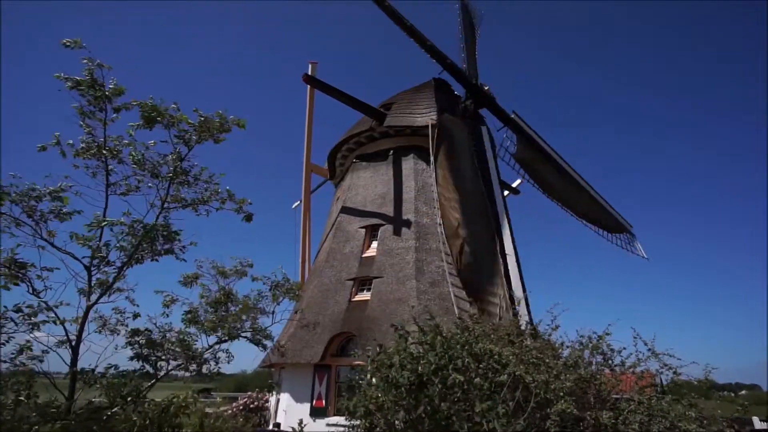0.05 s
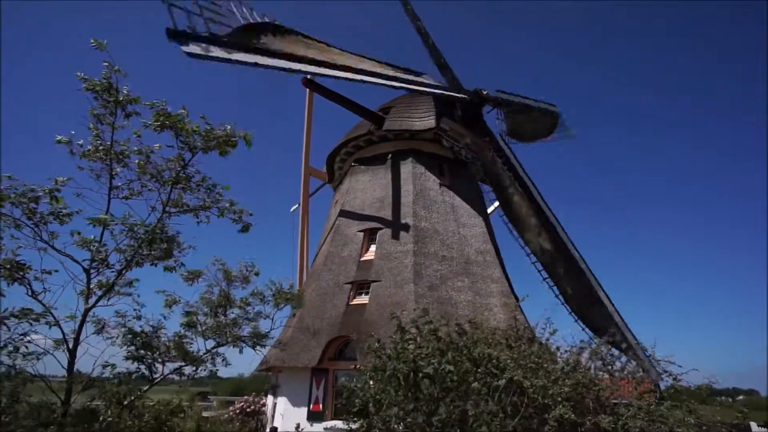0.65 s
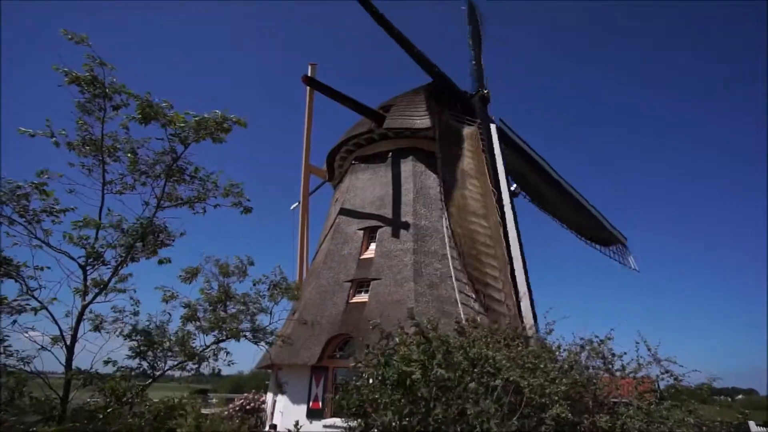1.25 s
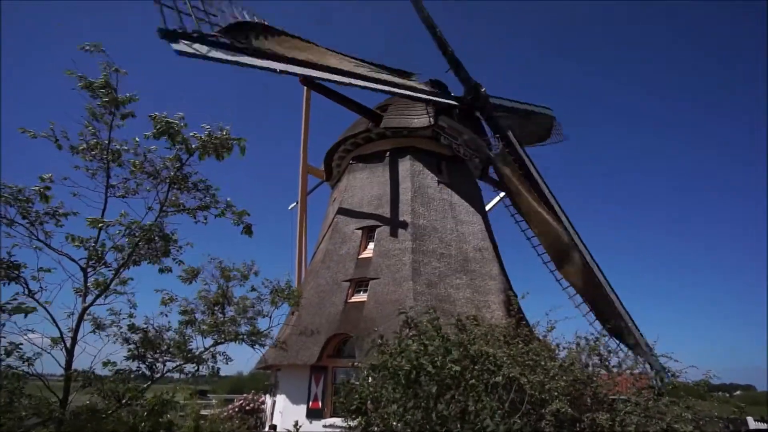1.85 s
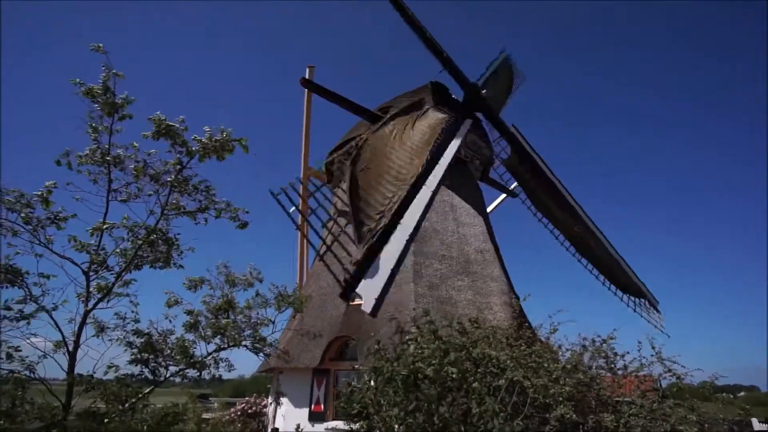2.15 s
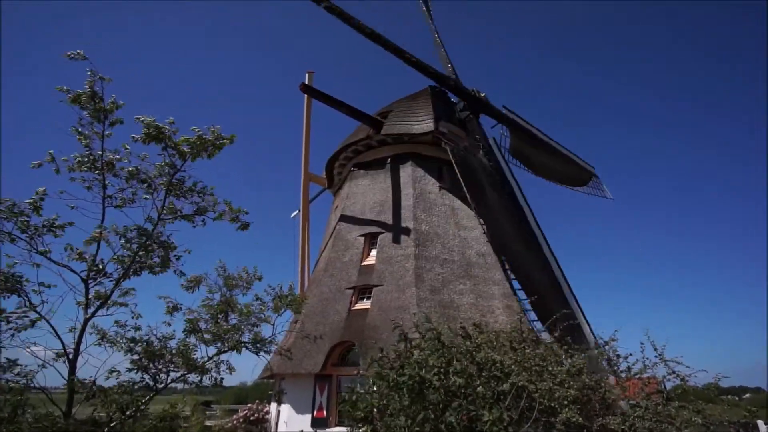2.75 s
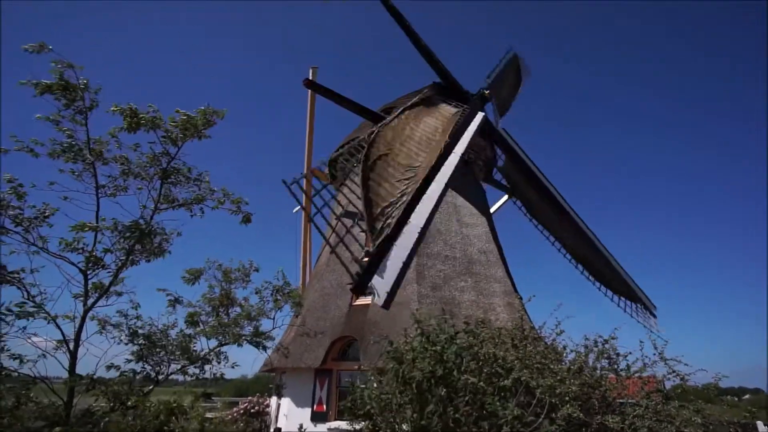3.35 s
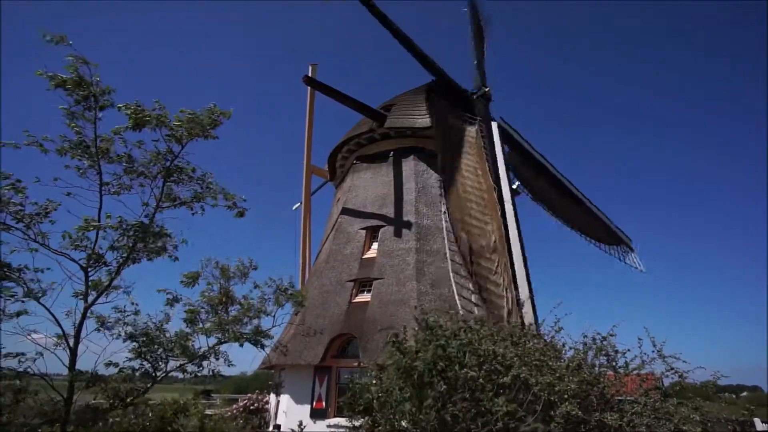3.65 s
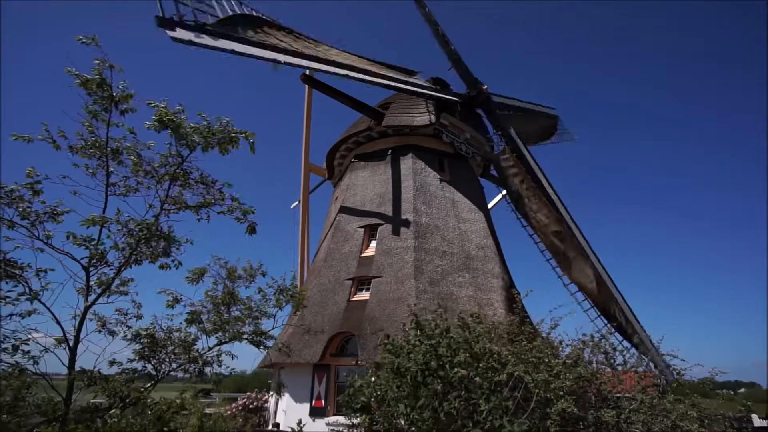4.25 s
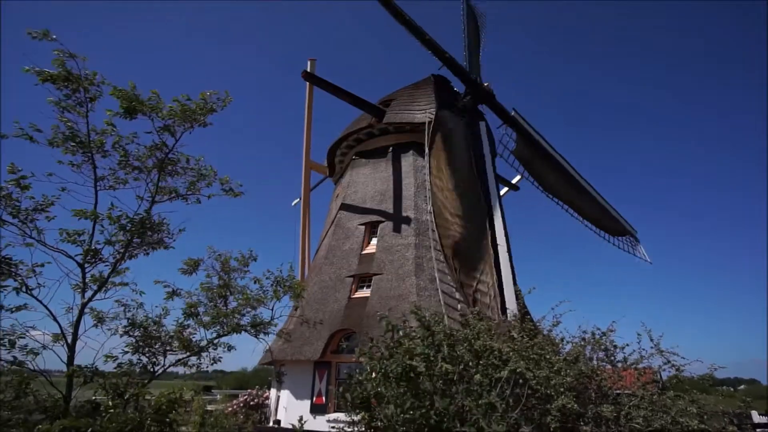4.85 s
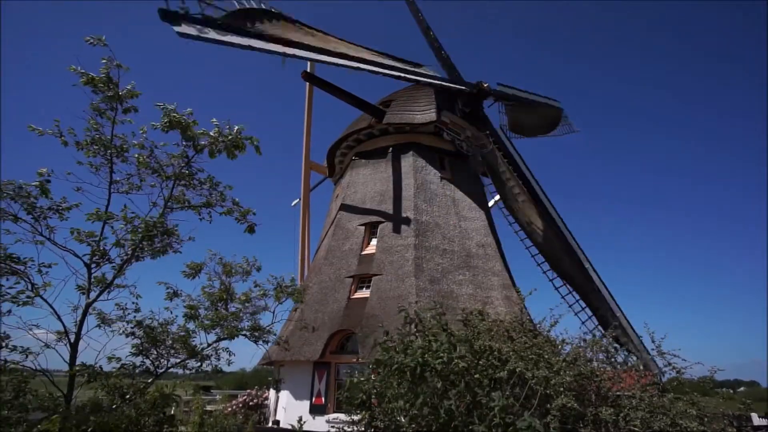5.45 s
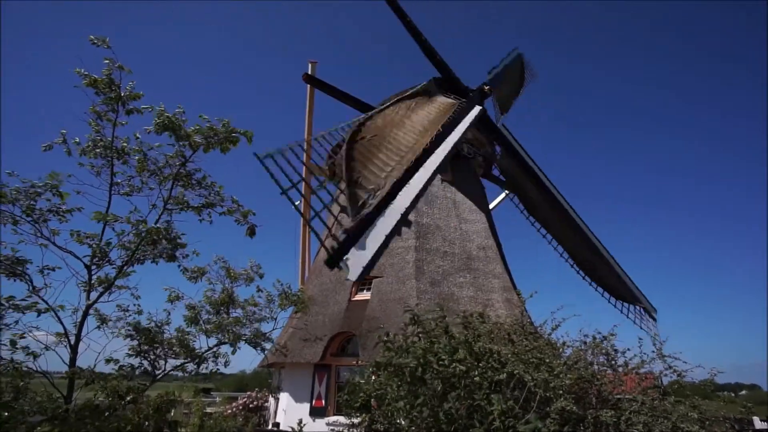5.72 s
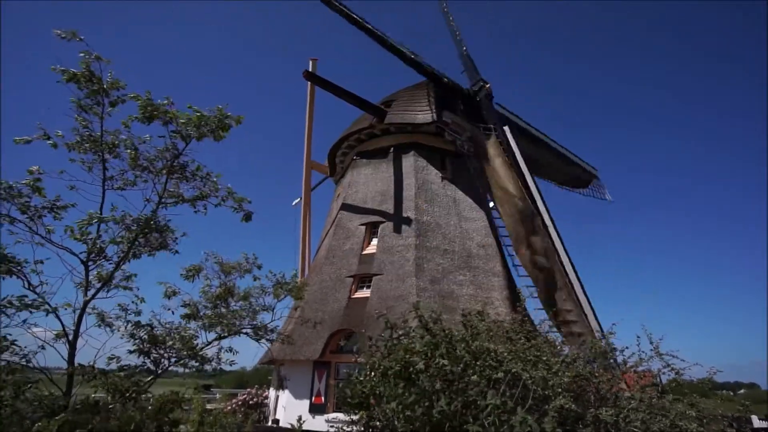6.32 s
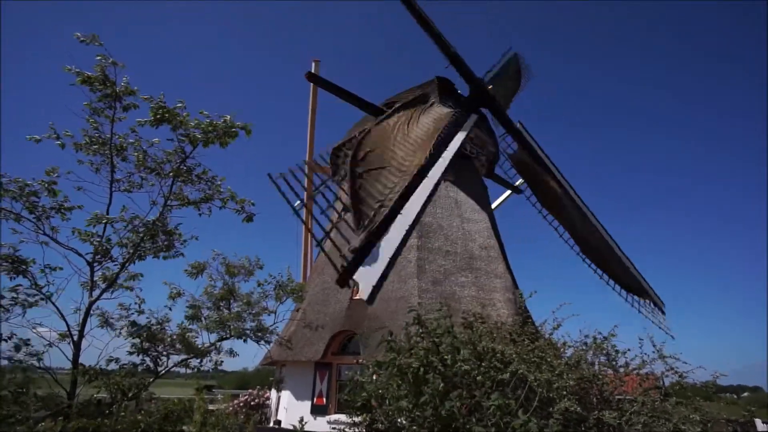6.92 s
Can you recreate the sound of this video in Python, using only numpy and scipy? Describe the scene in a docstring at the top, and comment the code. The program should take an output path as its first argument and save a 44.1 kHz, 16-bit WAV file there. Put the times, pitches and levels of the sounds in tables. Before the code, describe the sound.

Wind rushes continuously through trees, wide and soft, while a close bush rustles. Slightly to the right, windmill sails whoosh past in uneven swells roughly every 1.3 seconds, their canvas faintly crackling. Light gusts bump the microphone during the first second, and around 0.6 seconds come canvas flaps and dry wooden clacks. A few tiny chirps are barely audible. Scattered flaps and twig ticks follow, with leaves shaking from 2.5 seconds and sharp clacks just before 3. From 3 to about 4.1 seconds a strong gust buffets the microphone with low rumble and fluttering thumps, loudest near 3.5. It pushes the background down, and the level recovers slowly. From 4.2 to 6.4 seconds the sails swish on with soft canvas thuds, ticks and light wooden knocks, clustered around 5.7. A short buffet hits the microphone again near 7 seconds.

```python
"""A windmill turns in gusty wind, a little to the right of the microphone: its sails whoosh past,
their canvas flaps and crackles, and the woodwork clacks and knocks. Trees rush all around, a near
bush rustles and ticks, and a few faint chirps sound. Gusts buffet the microphone itself; the
strongest makes the gain control duck everything, and it recovers slowly."""
import sys
import numpy as np
from scipy import signal
from scipy.fft import rfft, irfft, next_fast_len
from scipy.io import wavfile
from scipy.ndimage import uniform_filter1d, map_coordinates

SR = 44100
rng = np.random.default_rng(int(sys.argv[2]) if len(sys.argv) > 2 else 0)


def master(y):
    """Save y as 16-bit WAV."""
    cut = np.clip(np.atleast_2d(y).T, -1, 1)
    pcm = np.round(cut * 32767)  # scale
    wavfile.write(sys.argv[1], SR, pcm.astype(np.int16))


N = 312228


def amp(db):
    """Decibels to gain."""
    return 10 ** (np.asarray(db) / 20)


def unit(x):
    """x scaled to rms 1."""
    return x / np.sqrt(np.mean(x ** 2) + 1e-20)


def along(points, hz):
    """(Hz, value) points read on a log axis."""
    f, v = np.transpose(points)
    return np.interp(np.log(hz + 1), np.log(f + 1), v)


def clock():
    """The time of every sample."""
    return np.arange(N) / SR


def curve(rows):
    """(s, value) rows joined by straight lines."""
    return np.interp(clock(), *np.transpose(rows))


def swell(s, half_width):
    """A smooth rise and fall around time s."""
    return np.exp(-((clock() - s) / half_width) ** 2)


def wobble(rate):
    """A smooth random curve, rate knots a second."""
    return map_coordinates(rng.standard_normal(4096), [clock() * rate], mode="mirror")


def add(out, s, sound):
    """Mix a stereo sound into out at time s."""
    out[:, round(s * SR):][:, :sound.shape[-1]] += sound


def filtered(x, response):
    """x through a filter whose gain is response(Hz)."""
    m = next_fast_len(N + 8192)
    return irfft(rfft(x, m) * response(np.fft.rfftfreq(m, 1 / SR)), m)[..., :N]


def low_cut(x, hz):
    """x with the bass rolled off below hz."""
    return signal.sosfilt(signal.butter(2, hz, "highpass", fs=SR, output="sos"), x)


def white():
    """Two unrelated white noises."""
    return rng.standard_normal((2, N))


def coloured(pair, spectrum, width):
    """Two unrelated signals become left and right, with a spectrum and a stereo width, at rms 1."""
    mid = filtered(pair[0], lambda hz: amp(along(spectrum, hz)))
    side = filtered(pair[1], lambda hz: amp(along(spectrum, hz) + along(width, hz)))
    return unit(np.array([mid + side, mid - side]))


def patchy(depth_db):
    """Two noises whose level drifts in patches of time and frequency."""
    spectra = signal.stft(white(), nperseg=512)[2]
    patches = uniform_filter1d(rng.standard_normal(spectra.shape[1:]), size=5, axis=0)
    patches = uniform_filter1d(patches, size=10, axis=1)
    return signal.istft(spectra * amp(depth_db * unit(patches)), nperseg=512)[1][:, :N]


def loudness(x, span):
    """Running rms of both channels over span seconds."""
    power = uniform_filter1d(np.mean(x ** 2, axis=0), max(int(span * SR), 1))
    return np.sqrt(np.abs(power) + 1e-12)


def evened(x, span):
    """Noise held near rms 1, so that a short burst of it has a definite strength."""
    return x / loudness(x, span)


def bursts(times, levels_db, t60s, attack):
    """An envelope of bursts that rise quickly to their level and die away."""
    envelope, t = np.zeros(N + SR), np.arange(SR // 2) / SR
    for s, db, t60 in np.broadcast(times, levels_db, t60s):
        shape = (1 - np.exp(-(t / attack) ** 2)) * np.exp(-np.log(1000) * t / t60)
        envelope[max(round(s * SR), 0):][:len(t)] += amp(db) * shape / shape.max()
    return envelope[:N]


# The wind out at the mill and the greenery. Each row: time in seconds, strength in dB.
WIND = [(0, -5), (.5, 1.5), (.9, -2.5), (2.2, -2.5), (3.1, 0.5), (4.3, 2), (5.4, -1), (6.0, 1.5), (7.08, 1)]
# A sail passes the tower, swings up, and the next comes down.
# Each row: delay of that swish in seconds, half width in seconds.
SWISHES = [(0, 0.11), (.33, 0.064), (.57, 0.044)]
# One pass after another. Each row: tower, upswing and downswing levels in dB.
SAIL_PASSES = [(-55, -28.5, -45), (-35, -33.5, -32.5), (-32, -48, -50), (-46, -52, -31), (-32, -33, -46),
               (-32, -53, -50)]
FIRST_PASS_S, PASS_PERIOD_S, LATTICE_DB = 0.056, 1.255, -33.5

def sail_flow():
    """Air over the sails: a steady share from the wind, and three swishes at every pass."""
    power = amp(LATTICE_DB + curve(WIND)) ** 2
    for k, levels_db in enumerate(SAIL_PASSES):
        for (delay, half_width), db in zip(SWISHES, levels_db):
            power += amp(db) ** 2 * swell(FIRST_PASS_S + k * PASS_PERIOD_S + delay, half_width)
    return np.sqrt(power)


# The whoosh as it reaches the microphone. Each row: frequency in Hz, relative level in dB.
WHOOSH_SPECTRUM = [(30, -31), (100, -10.5), (190, -3), (260, 0.5), (430, 0), (620, -4), (1000, -5),
                   (1400, -7.5), (1850, -14.5), (2200, -21), (3300, -21.5), (4500, -37), (11000, -48)]
# Stereo width of the sails. Each row: frequency in Hz, side minus mid in dB.
SAIL_WIDTH = [(200, -70), (600, -17), (1200, -6.5), (3000, -3.5), (6000, 6)]

def sails(flow):
    """Stocks and lattice cut the air in an even whoosh with a fine flutter."""
    flutter_db = .5 * wobble(25) + 1.27 * wobble(160)
    return flow * amp(flutter_db) * coloured(patchy(depth_db=2.0), WHOOSH_SPECTRUM, SAIL_WIDTH)


# Wind up in the trees. Each row: frequency in Hz, relative level in dB.
CANOPY_SPECTRUM = [(100, -52), (400, -1), (900, 12.5), (1400, 1.5), (1900, 3.5), (2200, -4), (3000, -14.5),
                   (3600, -9), (4500, -17), (8000, -18.5)]
# Stereo width in the open air. Each row: frequency in Hz, side minus mid in dB.
OPEN_WIDTH = [(300, -18), (1000, -12), (2000, 0.5), (4000, 1), (10000, 0.5)]

def trees(level_db=-38.5):
    """A wide, soft rush from the crowns rises and falls with the wind."""
    sway_db = .9 * wobble(12)
    rush = coloured(patchy(depth_db=-0.5), CANOPY_SPECTRUM, OPEN_WIDTH)
    return amp(level_db + curve(WIND) + sway_db) * rush


# Leaves near the microphone. Each row: frequency in Hz, relative level in dB.
RUSTLE_SPECTRUM = [(800, -55), (2500, 8), (3500, 6), (4700, 0.5), (5800, 4), (6900, -1.5), (7650, 0.5),
                   (8300, -1), (10100, -0.5), (11200, -4)]
# The bush is shaken. Each row: peak time in seconds, half width in seconds, level in dB.
BUSH_SHAKES = [(.38, 0.078, -42.5), (0.631, 0.076, -39), (1.3, 0.059, -66), (2.51, 0.096, -39),
               (2.92, 0.17, -39.5), (3.35, 0.18, -41.5), (4.34, 0.025, -38), (5.6, 0.1, -41),
               (6.761, 0.11, -49)]

def bush(level_db=-42.5, wind_share=0.1, touches_per_s=350):
    """Close by, sheltered leaves hiss and touch in tiny grains, more loudly when shaken."""
    touches = rng.random(N) < touches_per_s / SR
    touch_db = 12.0 * np.minimum(rng.exponential(size=N), 2.2)
    grains = coloured(touches * amp(touch_db) * white(), RUSTLE_SPECTRUM, OPEN_WIDTH)
    hiss = coloured(patchy(depth_db=1.5), RUSTLE_SPECTRUM, OPEN_WIDTH)
    power = amp(level_db + wind_share * curve(WIND)) ** 2
    power += sum(amp(db) ** 2 * swell(s, half_width) for s, half_width, db in BUSH_SHAKES)
    return np.sqrt(power) * amp(1.1 * wobble(21.74)) * (hiss + amp(-8.5) * grains)


# Light turbulence on the microphone between gusts. Each row: time in seconds, strength in dB.
BREEZE = [(0, -37.5), (1.05, -54), (1.65, -58), (2.1, -47), (2.75, -57), (3.35, -22.5), (4.6, -38.5),
          (5.1, -55.5), (5.62, -61), (5.9, -40.5), (7.08, -53)]
# Gusts right on the microphone. Each row: start in seconds, hold in seconds, strength in dB.
GUSTS = [(.01, 0.012, -26.5), (0.17, 0.086, -27.5), (0.347, 0.049, -30.5), (0.486, 0.017, -35.5),
         (0.74, 0.015, -30), (0.816, 0.19, -32.5), (1.997, 0.033, -30.5), (2.423, 0.07, -33.5),
         (2.899, 0.15, -27), (3.044, .02, -18.5), (3.114, 0.12, -18), (3.246, 0.25, -15.5),
         (3.448, 0.04, -5), (3.488, 0.038, -10), (3.655, 0.14, -19), (3.794, 0.083, -15.5),
         (3.863, 0.099, -18.5), (4.056, 0.015, -16), (4.11, 0.012, -24), (4.513, 0.036, -26),
         (5.87, 0.25, -39.5), (6.244, 0.4, -36), (6.307, 0.0081, -32), (6.793, 0.057, -33.5),
         (6.889, 0.012, -28), (6.972, 0.0084, -20), (7.027, 0.018, -26)]

def gust_force(attack_s=0.012, release_s=0.021):
    """Each gust rises out of the breeze, holds and drops away."""
    t, force = clock(), amp(curve(BREEZE))
    for s, hold, db in GUSTS:
        outside = np.maximum((s - t) / attack_s, (t - s - hold) / release_s)
        force = np.maximum(force, amp(db) * np.exp(-np.clip(outside, 0, 20)))
    return force


# Large eddies, then small ones, at the microphone. Each row: frequency in Hz, relative level in dB.
RUMBLE_SPECTRUM = [(20, -28), (40, -22), (75, -3), (150, 2.5), (260, 0), (450, -17), (800, -72),
                   (1500, -43), (3000, -70), (6000, -100)]
FLUTTER_SPECTRUM = [(80, -39), (200, 1), (350, 1.5), (650, -7), (1000, -19.5), (1500, -29.5), (2200, -38),
                    (4000, -51), (9000, -76)]
# How far the two microphone ports disagree. Each row: frequency in Hz, side minus mid in dB.
PORT_WIDTH = [(60, -5), (130, -8.5), (250, 0.5), (500, 5.5), (900, 3.5), (2000, 3)]

def buffeting(gusts):
    """Eddies rumble on the ports; faster air shifts energy to smaller ones, which flutter higher."""
    force = gusts * amp(.8 * wobble(25) + 1.6 * wobble(90))
    brightness = np.minimum(force / amp(-19.5), 1.4) ** 0.76
    rumble = force * evened(coloured(white(), RUMBLE_SPECTRUM, PORT_WIDTH), span=0.033)
    small_eddies = coloured(white() * amp(3.5 * wobble(220)), FLUTTER_SPECTRUM, PORT_WIDTH)
    flutter = force * brightness * evened(small_eddies, span=0.022)
    return amp(6.0) * rumble / np.sqrt(1 + 3 * brightness ** 2) + amp(4.5) * flutter


def kick(hz, start, apart):
    """A pressure kick of a few cycles whose swing slows; the sides lie +/- apart radians in phase."""
    t = np.arange(SR // 20) / SR
    age = t * hz / 0.66
    phase = 2 * np.pi * (start + 1.435 * hz * t / (1 + 0.15 * age))
    return (age * np.exp(1 - age)) ** 1.35 * np.sin([phase + apart, phase - apart])


# The hardest eddies to hit the microphone.
# Each row: start in seconds, relative level in dB, rough pitch in Hz.
HARD_EDDIES = [(0.016, -6, 417), (0.201, -2.5, 397), (0.228, -2.5, 477), (0.259, -4.5, 296),
               (0.503, -7, 330), (0.812, 0.5, 430), (0.819, -5, 295), (0.845, -3, 384), (0.988, -9.5, 230),
               (2.013, -19.5, 200), (2.030, -9, 220), (2.898, -2, 384), (3.049, -1, 333), (3.058, 3, 295),
               (3.11, 3, 322), (3.175, 8.5, 450), (3.186, 10, 593), (3.201, 10, 440), (3.259, 1, 385),
               (3.265, 8, 517), (3.316, -3, 298), (3.341, 6.5, 394), (3.408, 7, 720), (3.434, 14, 790),
               (3.452, 4, 330), (3.456, 15.5, 704), (3.48, 3, 380), (3.515, 7.5, 705), (3.532, 3, 480),
               (3.667, -1, 398), (3.716, 2, 450), (3.779, 9, 376), (3.823, 3, 298), (3.834, 7, 596),
               (3.85, 13.5, 590), (3.893, 3, 570), (3.923, 8.5, 267), (3.942, 1, 553), (3.949, 8, 410),
               (3.956, -8, 477), (4.055, 12, 330), (4.087, 6, 620), (6.891, -5.5, 279), (6.95, 4.5, 544),
               (6.962, 4, 450), (6.977, -4, 454), (7.015, -3, 253), (7.023, 0, 276)]

def puffs(gusts, lesser_per_s=12, usual_hz=406):
    """Single eddies kick the microphone's two ports out of step; lesser ones ride on the gusts."""
    out = np.zeros((2, N + SR))
    when, size, pitch = rng.random((int(lesser_per_s * N / SR), 3)).T
    lesser_db = 20 * np.log10(gusts[(when * N).astype(int)] * (1 + size) / 2) + 14.5
    eddies = HARD_EDDIES + list(zip(when * N / SR, lesser_db, usual_hz * 2 ** (pitch - .5)))
    for (s, db, hz), (start, turn) in zip(eddies, rng.random((len(eddies), 2))):
        apart = np.arctan(amp(along(PORT_WIDTH, hz))) * np.sign(turn - .5)
        add(out, s, amp(db - 6.5) * kick(hz, start, apart))
    return low_cut(out[:, :N], hz=70.4)


# Creasing cloth up on the sails. Each row: frequency in Hz, relative level in dB.
CREASE_SPECTRUM = [(400, -14), (1500, 3), (3400, 22), (5000, -34), (11000, -23)]

def crinkle(flow, count=100):
    """Small creases of the cloth crackle, more loudly when more air passes over the sails."""
    when, size = rng.random((count, 2)).T
    creases = bursts(when * N / SR, 5 * size ** 2 - 12.5, t60s=.016, attack=.0008)
    return creases * flow * evened(coloured(white(), CREASE_SPECTRUM, OPEN_WIDTH), span=.004)


# Faint chirps out in the open.
# Each row: start in seconds, pitch in Hz, relative level in dB, length in seconds.
CHIRPS = [(0.156, 2880, -18, 0.0026), (1.123, 2590, -28, 0.022), (1.133, 1500, -21, 0.0092),
          (1.137, 2240, -30, 0.017), (2.462, 10000, -26, 0.014), (2.47, 10740, -31, 0.021),
          (7.017, 4210, -22.5, 0.0095)]

def chirps(waver_hz=90, scatter_t60=0.08):
    """Brief, slightly wavering tones that scatter off the surroundings."""
    direct, t = np.zeros(N + SR), np.arange(SR // 16) / SR
    for s, hz, db, length in CHIRPS:
        waver = 1 + .022 * np.sin(2 * np.pi * (t * waver_hz + rng.random()))
        tone = np.sin(2 * np.pi * np.cumsum(hz * waver) / SR)
        arch = np.sin(np.pi * np.minimum(t / length, 1))
        direct[round(s * SR):][:len(t)] += amp(db - 7.5) * arch * tone
    t = np.arange(SR // 4) / SR
    tail = rng.standard_normal((2, len(t))) * np.exp(-np.log(1000) * t / scatter_t60)
    scatter = signal.fftconvolve(direct[None], tail / np.linalg.norm(tail[0]), axes=1)
    return direct[:N] + amp(1.5) * scatter[:, :N]


# Canvas flapping up on the lattice. Each row: start in seconds, relative thud level in dB,
# rough thud pitch in Hz, relative slap level in dB, slap t60 in seconds.
FLAPS = [(0.553, -34, 500, -31, 0.065), (0.576, -38.5, 440, -31, 0.14), (0.624, -31, 800, -30, 0.02),
         (0.639, -30, 805, -27, 0.025), (0.667, -46, 690, -21.5, 0.087), (1.255, -33.5, 328, -32.5, 0.19),
         (1.311, -47, 396, -29, 0.072), (1.835, -27, 620, -48, 0.042), (2.544, -38, 500, -26.5, 0.16),
         (4.192, -17.5, 480, -39, 0.058), (4.362, -20, 770, -28.5, 0.03), (5.082, -22, 390, -34, 0.038),
         (5.206, -29, 308, -30.5, 0.11), (5.403, -36, 700, -32, 0.018), (5.408, -17.5, 268, -46, 0.026),
         (5.663, -26.5, 700, -28.5, 0.33), (6.016, -40, 700, -41, 0.077), (6.321, -23, 520, -44, 0.019),
         (6.345, -30, 400, -37, 0.17), (6.406, -26.5, 398, -33, 0.034)]
# The cloth's low thud and brighter slap. Each row: frequency in Hz, relative level in dB.
THUD_SPECTRUM = [(40, -46), (150, -30), (260, 0), (380, -3.5), (550, -18.5), (800, -7), (1500, -24),
                 (4000, -78)]
SLAP_SPECTRUM = [(200, -4), (600, 0), (1000, 6.5), (1500, 4.5), (2200, -6), (3400, -12), (5000, -38),
                 (11000, -45)]

def canvas():
    """The cloth snaps taut with one dry kick and a crack, then shudders against the lattice."""
    kicks = np.zeros((2, N + SR))
    for s, thud_db, hz, _, _ in FLAPS:
        add(kicks, s, amp(thud_db + 9.5) * kick(hz, start=rng.random(), apart=0.055))
    kicks = low_cut(kicks[:, :N], hz=167)  # light cloth radiates little bass
    s, thud_db, _, slap_db, t60 = np.transpose(FLAPS)
    thud_noise = evened(coloured(white(), THUD_SPECTRUM, SAIL_WIDTH), span=0.0059)
    slap_noise = evened(coloured(white(), SLAP_SPECTRUM, SAIL_WIDTH), span=0.0061)
    shudders = bursts(s, thud_db - 0.5, t60 * 2.0, attack=0.0023)
    cracks = bursts(s, slap_db + 1.5, t60s=0.015, attack=0.0005)
    slaps = bursts(s, slap_db - 0.5, t60, attack=0.003)
    return kicks + shudders * thud_noise + (slaps + cracks) * slap_noise


def struck(modes, blows, off_centre_db, detune, spread):
    """Each (s, dB, Hz) blow rings the modes, off_centre_db weaker per octave from its own Hz."""
    out, t = np.zeros((2, N + SR)), np.arange(SR // 6) / SR
    hz, mode_db, t60 = np.transpose(modes)[..., None]
    for s, db, centre_hz in blows:
        strength_db, shift, start, apart = rng.standard_normal((4, len(modes), 1))
        shares = amp(mode_db + strength_db - off_centre_db * np.abs(np.log2(hz / centre_hz)))
        ring = shares * np.exp(-np.log(1000) * t / t60) * (1 - np.exp(-t / 0.0002))
        phase = 2 * np.pi * (hz * (1 + detune * shift) * t + start)
        pair = np.sum(ring * np.sin([phase + spread * apart, phase - spread * apart]), axis=1)
        add(out, s, amp(db) * pair / np.linalg.norm(shares))
    return out[:, :N]


def splinter(hz, t60, band_ratio):
    """A dry stereo burst of noise in a broad band around hz."""
    t = np.arange(SR // 40) / SR
    edges = np.clip([hz / band_ratio, hz * band_ratio], 100, 20000)
    band = signal.butter(2, edges, "bandpass", fs=SR, output="sos")
    mid, side = signal.sosfilt(band, rng.standard_normal((2, len(t))))
    noise = evened(np.array([mid + .7 * side, mid - .7 * side]), span=.003)
    return noise * np.exp(-np.log(1000) * t / t60)


# The snap of dry wood, at mill and bush alike. Each row: frequency in Hz, relative level in dB.
SNAP_SPECTRUM = [(1500, 6.5), (4200, -4.5), (5200, -10), (6900, -3.5), (7700, -14), (8800, -3),
                 (10200, -5.5), (11200, 0)]

def snapped(contacts, modes, off_centre_db, detune):
    """Each contact is a bright snap over a short woody ring, half of it rough noise."""
    s, snap_db, ring_db, hz = np.transpose(contacts)
    crack = evened(coloured(white(), SNAP_SPECTRUM, OPEN_WIDTH), span=0.0047)
    snaps = bursts(s, snap_db + 7.0, t60s=0.014, attack=0.0003)
    rough = np.zeros((2, N + SR))
    for when, _, db, centre_hz in contacts:
        add(rough, when, amp(db - 4.5) * splinter(centre_hz, t60=.017, band_ratio=1.55))
    ring = struck(modes, zip(s, ring_db - 3.5, hz), off_centre_db, detune, spread=0.7)
    return snaps * crack + rough[:, :N] + ring


# Hard, dry clacks over at the mill.
# Each row: start in seconds, relative snap and ring levels in dB, centre of the ring in Hz.
CLACKS = [(0.6165, -29, -17.5, 2400), (0.6245, -25, -23, 1700), (0.641, -30, -31, 2000),
          (2.92, -35, -15, 2060), (2.975, -29, -19, 8500), (2.9815, -20.5, -11.5, 3900)]
# Modes of the clacking wood. Each row: frequency in Hz, relative level in dB, t60 in seconds.
HARDWOOD_MODES = [(1390, 1, 0.038), (2480, -1, 0.017), (2940, 0.5, 0.026), (4640, -24, 0.018),
                  (7770, 4, .018), (8500, -3, .018), (9200, -6, 0.021), (10040, -4, 0.021)]

def clacks():
    """One hard piece of the woodwork is struck again and again, and rings alike each time."""
    return snapped(CLACKS, HARDWOOD_MODES, off_centre_db=4.0, detune=0.004)


# Ticks of twigs and leaves near the microphone.
# Each row: start in seconds, relative snap and ring levels in dB, centre of the ring in Hz.
TICKS = [(0.637, -39, -30, 3020), (0.666, -32, -27, 3500), (1.799, -42, -28, 7000), (1.835, -24, -29, 4500),
         (2.164, -26.5, -30, 4500), (2.174, -28, -31, 3300), (2.588, -35, -28, 3000),
         (2.826, -36, -33, 5500), (4.361, -37, -21, 3000), (4.852, -42, -24.5, 4550),
         (5.015, -47, -26.5, 2850), (5.238, -43, -21.5, 2400), (5.333, -44, -23.5, 1870),
         (5.469, -42, -31, 3000), (5.49, -45, -22, 2380), (5.536, -28, -32, 4000), (5.542, -36, -36, 9000),
         (5.611, -35, -33, 3700), (5.6425, -44, -23, 3700), (5.657, -34, -35, 9000),
         (5.665, -29, -35, 8000), (6.287, -36, -22.5, 3900), (6.379, -43, -29, 3300)]
# Modes of a dry twig. Each row: frequency in Hz, relative level in dB, t60 in seconds.
TWIG_MODES = [(1380, 22, 0.029), (1960, 13.5, 0.037), (2390, 6, 0.011), (2880, 8.5, 0.013),
              (3620, 4, 0.026), (4520, -13, 0.018), (5810, -1.5, 0.014), (8000, -5, 0.0096),
              (8630, -3, 0.022), (10000, -6, 0.02)]

def twigs():
    """Many different twigs tick, each at a slightly different pitch."""
    return snapped(TICKS, TWIG_MODES, off_centre_db=13.0, detune=0.025)


# Knocks up in the sail frame. Each row: start in seconds, level in dB, centre of the ring in Hz.
KNOCKS = [(0.668, -18, 1430), (2.558, -19, 900), (4.361, -17, 1300), (5.665, -17.5, 1400),
          (5.685, -13, 940), (5.764, -22.5, 1400), (5.776, -18, 1430), (5.801, -21.5, 1400),
          (6.017, -23, 1161), (6.382, -19.5, 1800), (6.39, -20.5, 1600)]
# Modes of the frame. Each row: frequency in Hz, relative level in dB, t60 in seconds.
TIMBER_MODES = [(890, -4, .06), (1060, -5, .04), (1290, -2, .045), (1430, 0, .055), (1800, -7, .035),
                (2500, -19, .03), (3180, -19, .03)]

def timbers():
    """The wooden frame knocks as its load shifts."""
    return struck(TIMBER_MODES, KNOCKS, off_centre_db=8, detune=0.018, spread=0.35)


def scene():
    """Mill and greenery lie a little to the right; the buffeting is on the microphone itself."""
    flow, gusts = sail_flow(), gust_force()
    mill = sails(flow) + canvas() + crinkle(flow) + timbers()
    outdoors = mill + trees() + bush() + twigs() + clacks() + chirps()
    return outdoors * amp([[-1.1], [.9]]) + buffeting(gusts) + puffs(gusts)


def gain_control(x, threshold_db, slope, span, recovery_db_per_s):
    """Sound over the threshold turns the gain down at once; it comes back at a steady rate."""
    excess_db = slope * np.maximum(20 * np.log10(loudness(x, span)) - threshold_db, 0)
    recovery_db = recovery_db_per_s * clock()
    held_db = np.maximum.accumulate(excess_db + recovery_db) - recovery_db
    return x * amp(-uniform_filter1d(held_db, size=128))


def record(dry, top_hz=11100):
    """The camera rides its gain slowly, limits the peaks quickly and cuts off steeply at top_hz."""
    ridden = gain_control(dry, threshold_db=-17.5, slope=0.47, span=0.0075, recovery_db_per_s=5.0)
    limited = gain_control(ridden, threshold_db=-13.5, slope=0.89, span=0.0045, recovery_db_per_s=100)
    return filtered(limited, lambda hz: 1 / np.sqrt(1 + (hz / top_hz) ** 300))


dry = scene()
out = record(dry)
master(out)
```